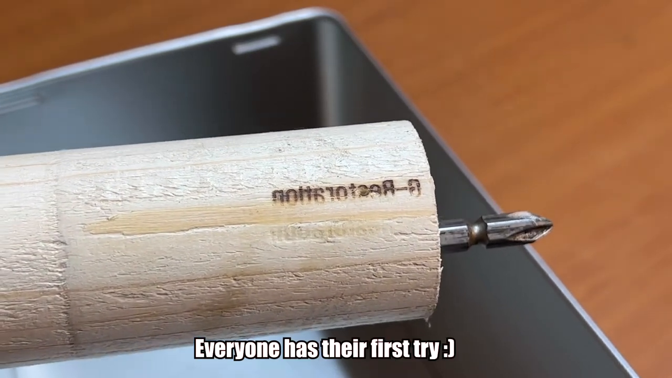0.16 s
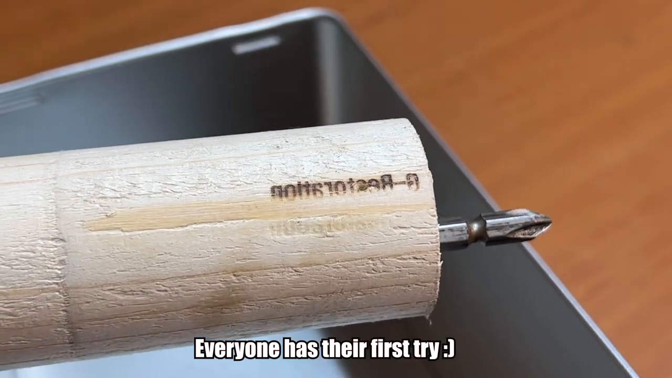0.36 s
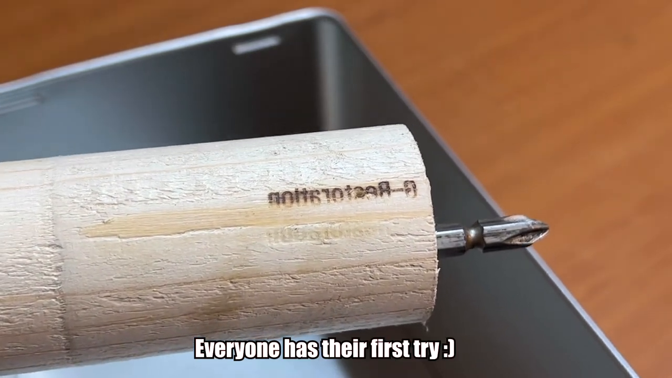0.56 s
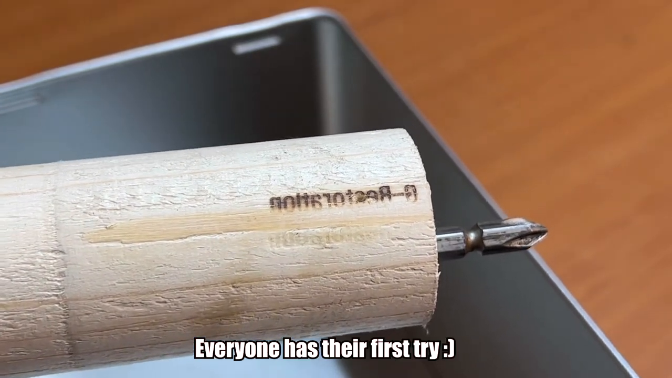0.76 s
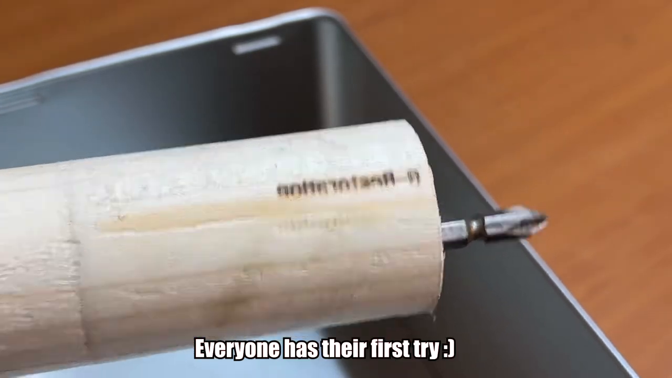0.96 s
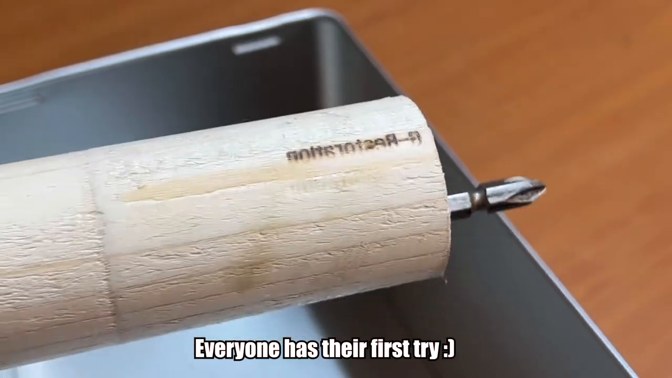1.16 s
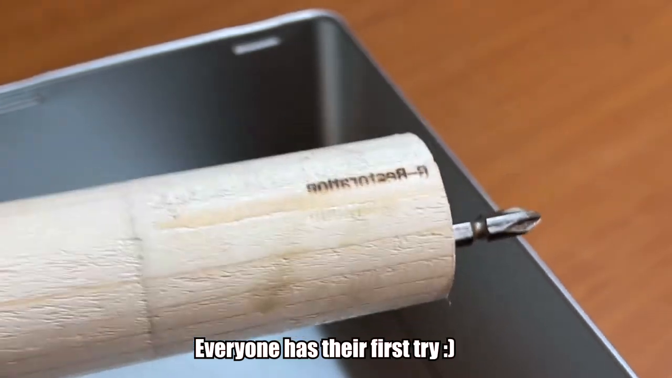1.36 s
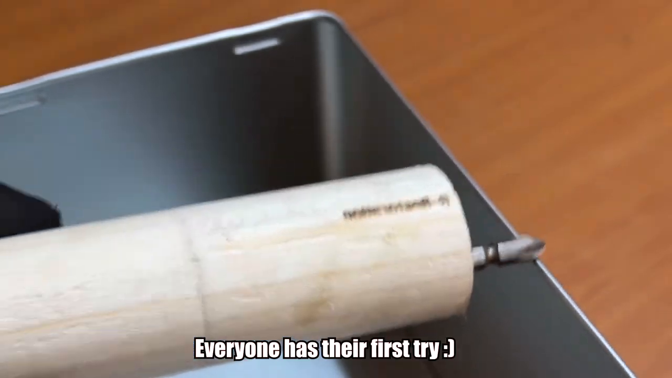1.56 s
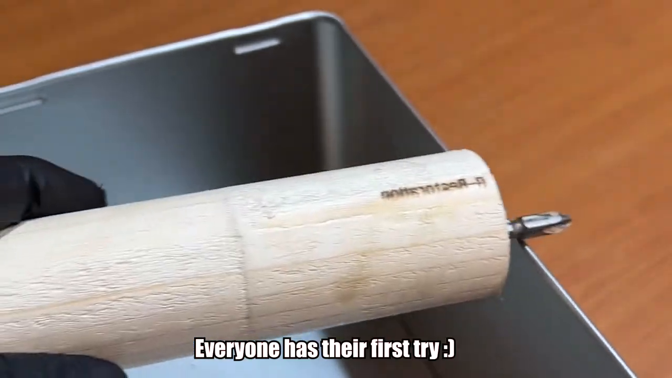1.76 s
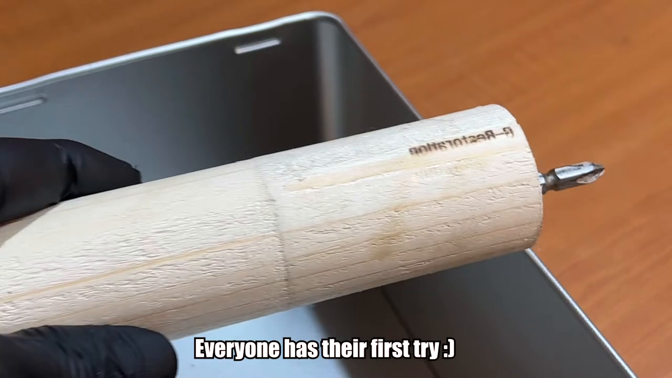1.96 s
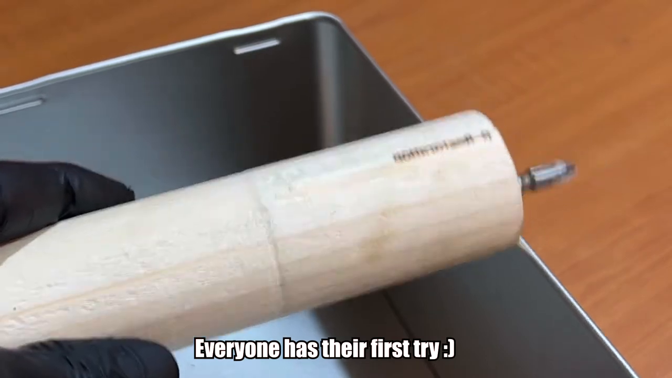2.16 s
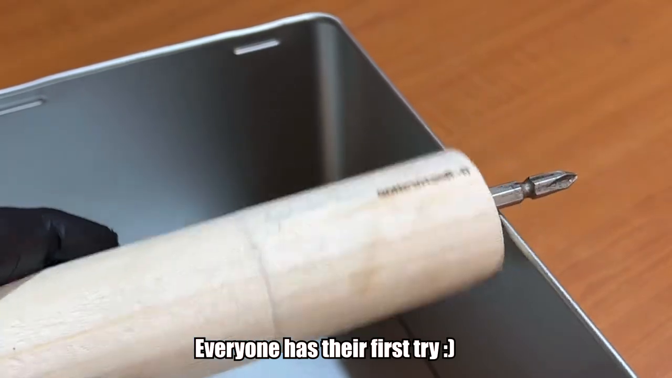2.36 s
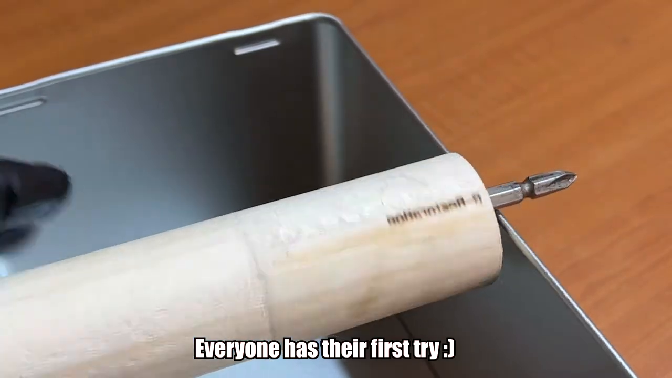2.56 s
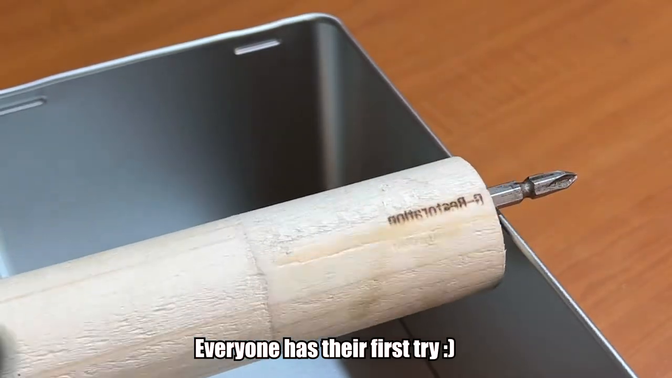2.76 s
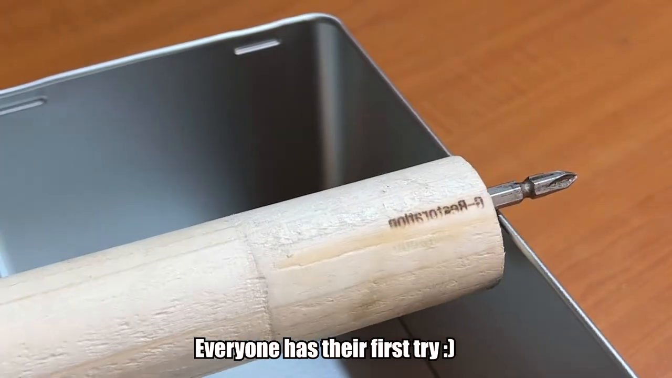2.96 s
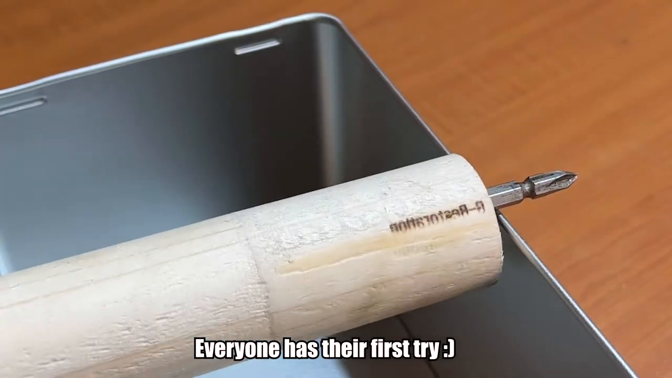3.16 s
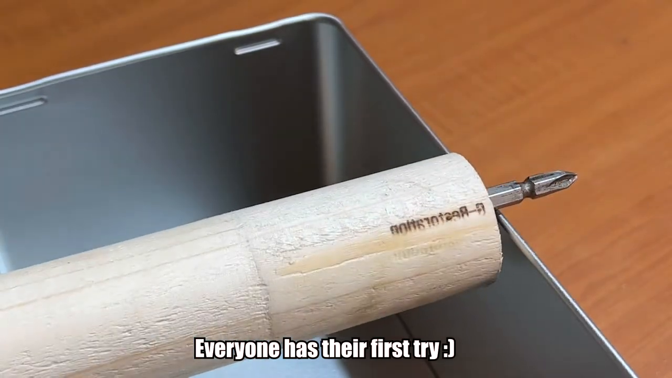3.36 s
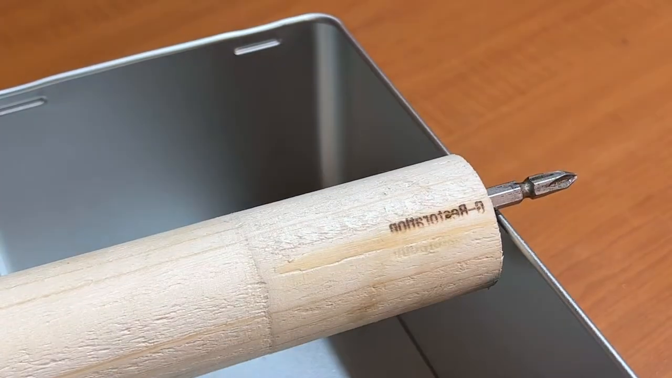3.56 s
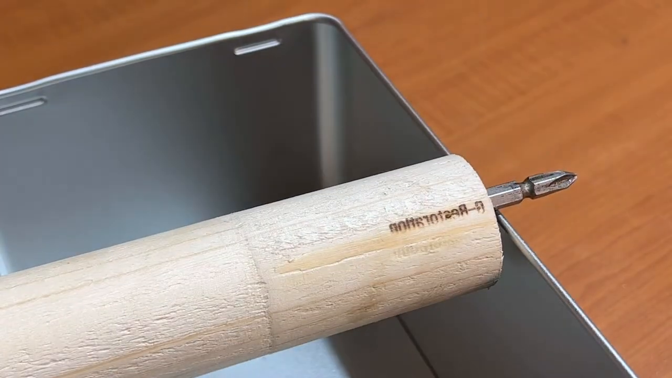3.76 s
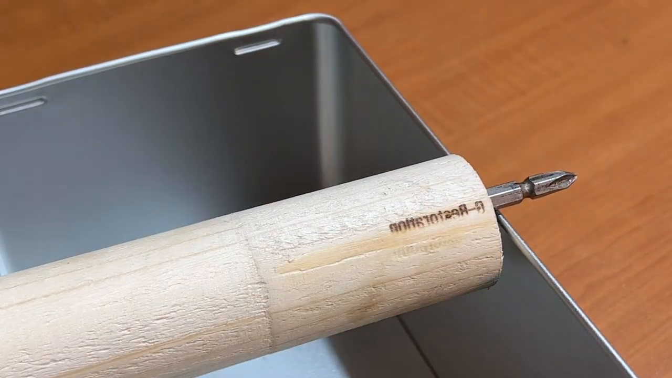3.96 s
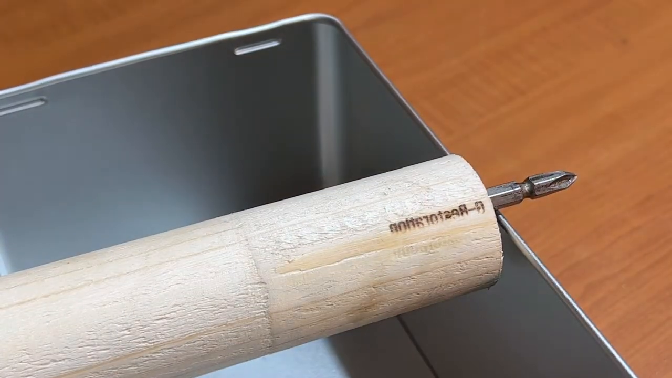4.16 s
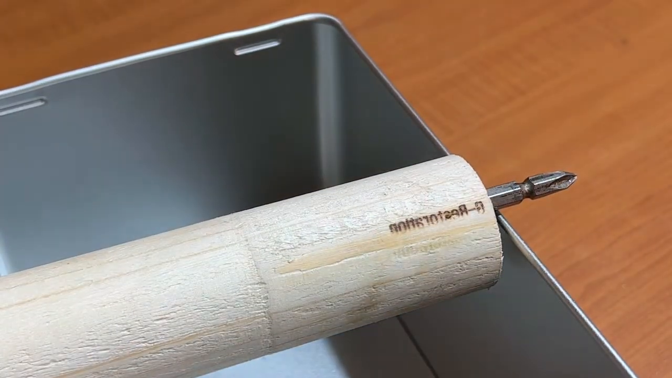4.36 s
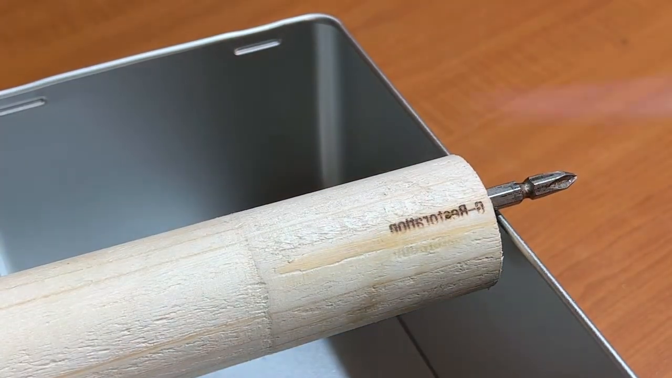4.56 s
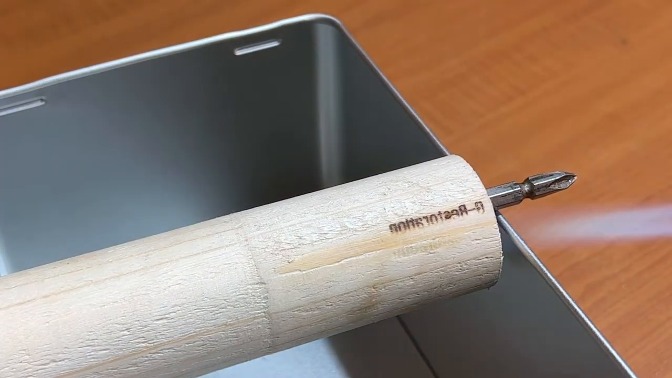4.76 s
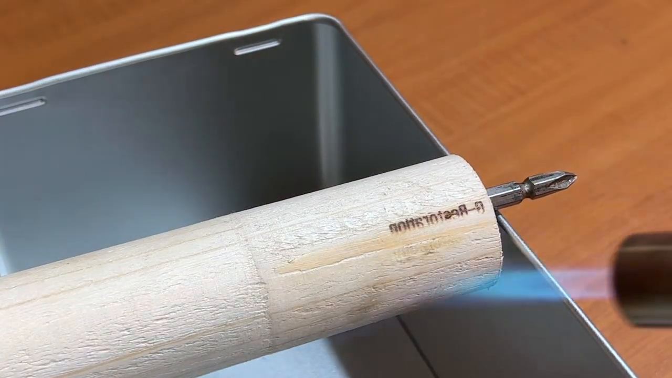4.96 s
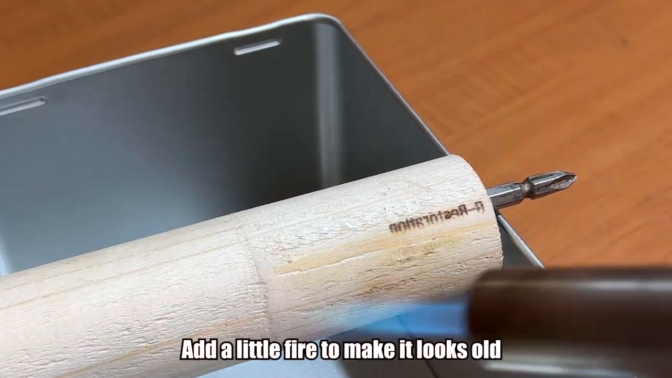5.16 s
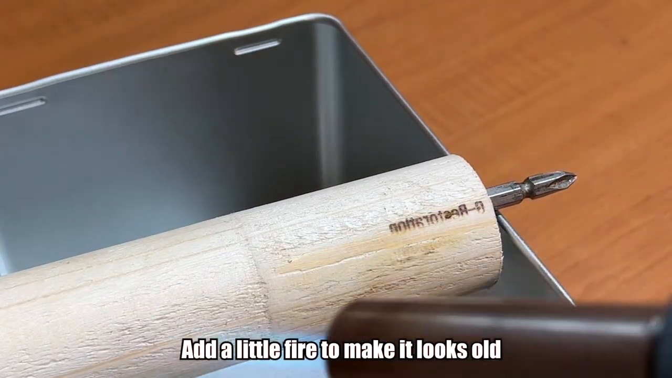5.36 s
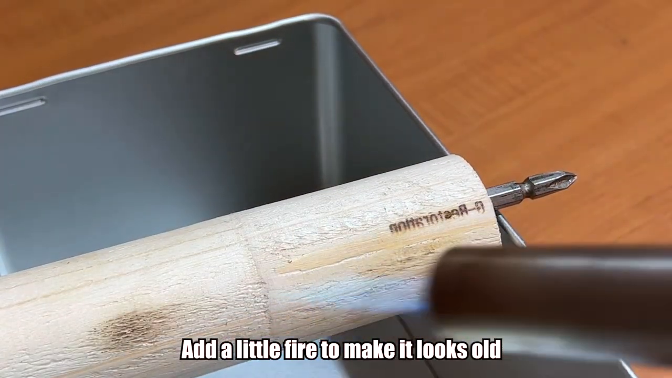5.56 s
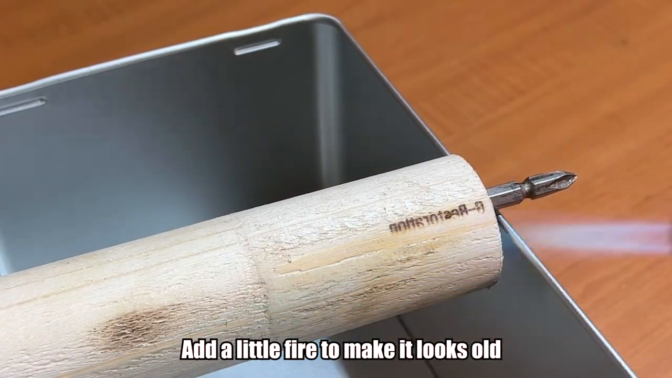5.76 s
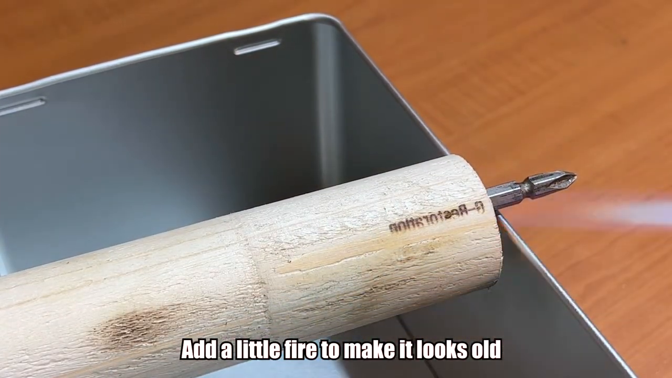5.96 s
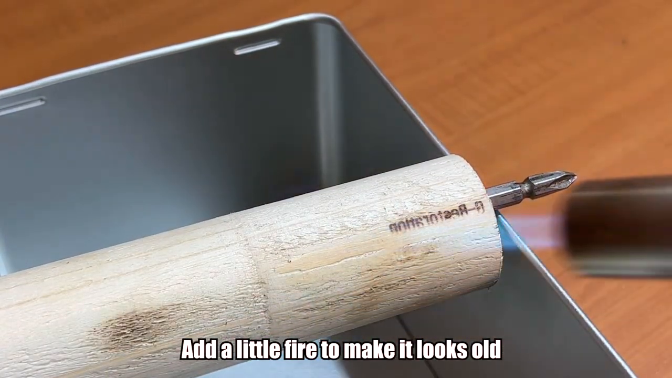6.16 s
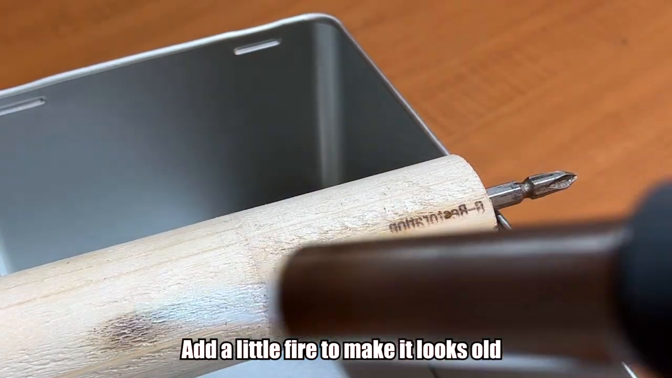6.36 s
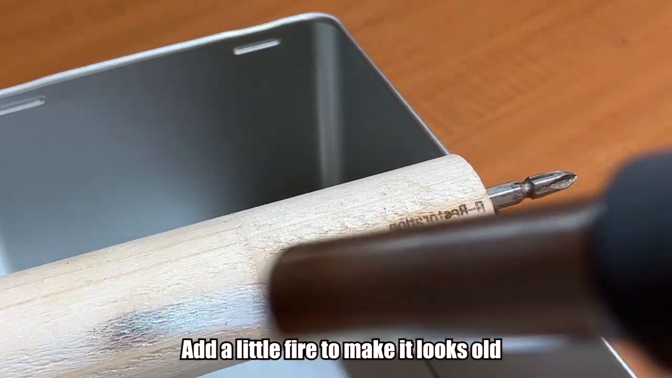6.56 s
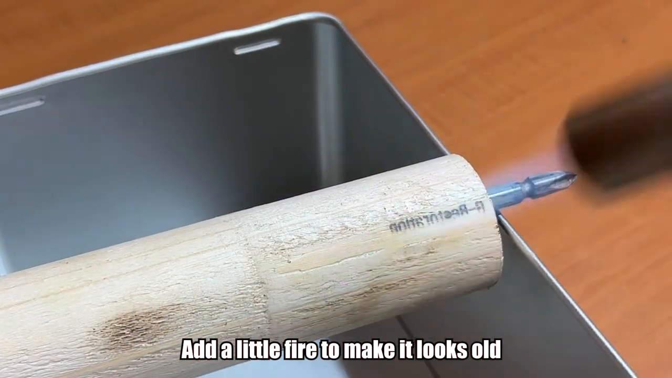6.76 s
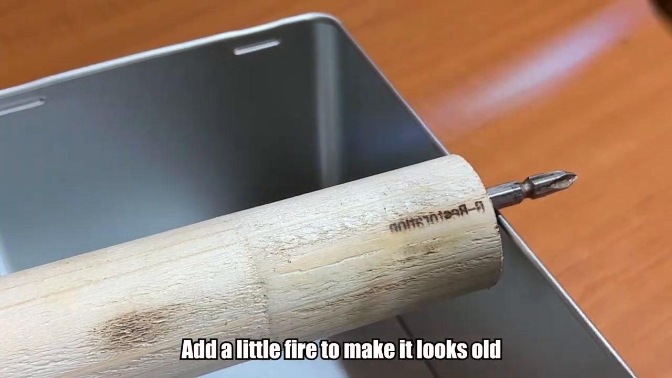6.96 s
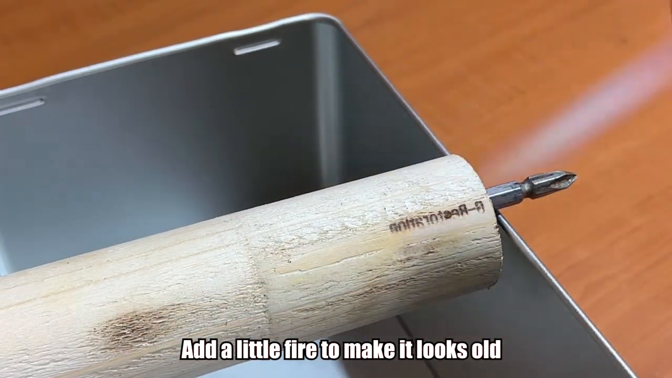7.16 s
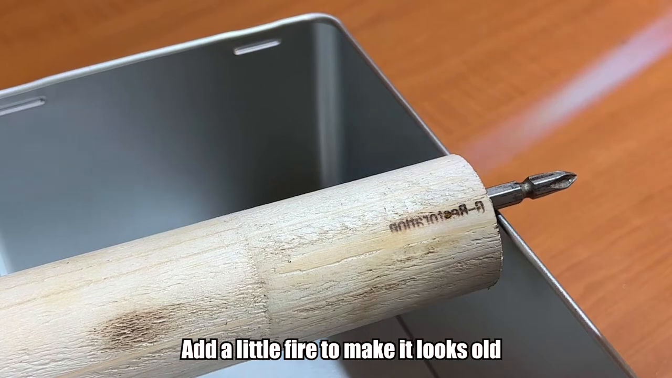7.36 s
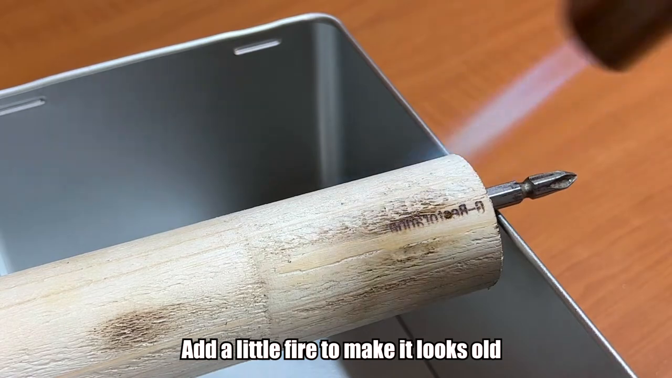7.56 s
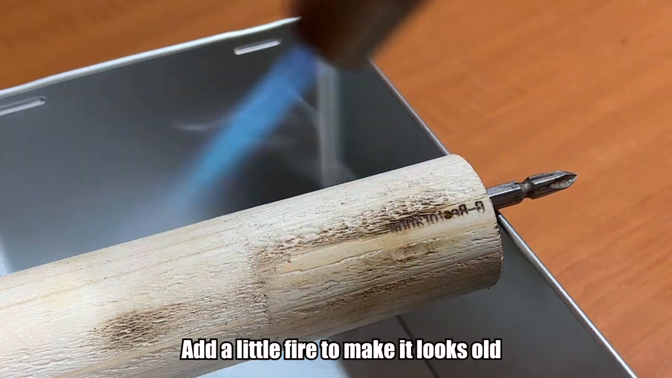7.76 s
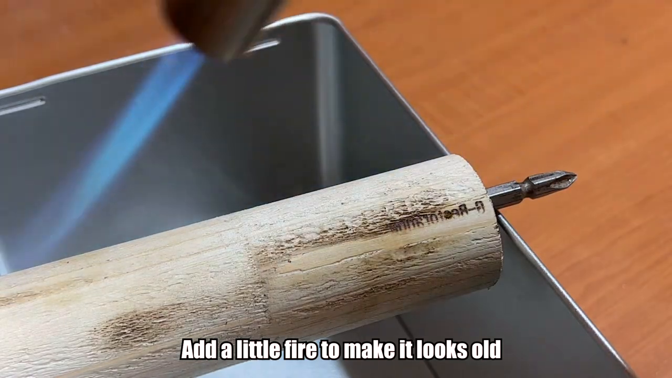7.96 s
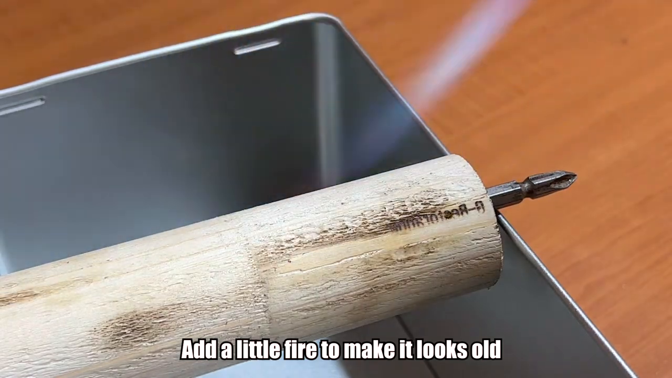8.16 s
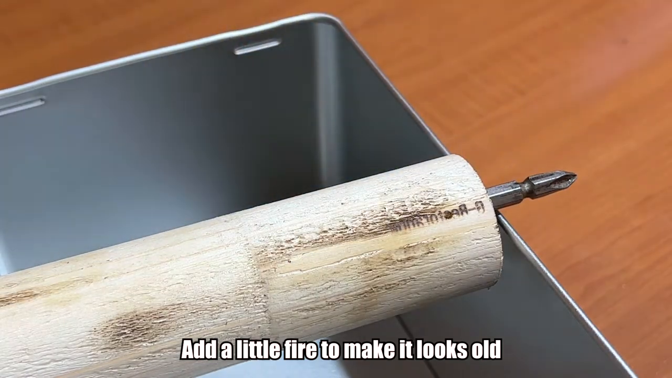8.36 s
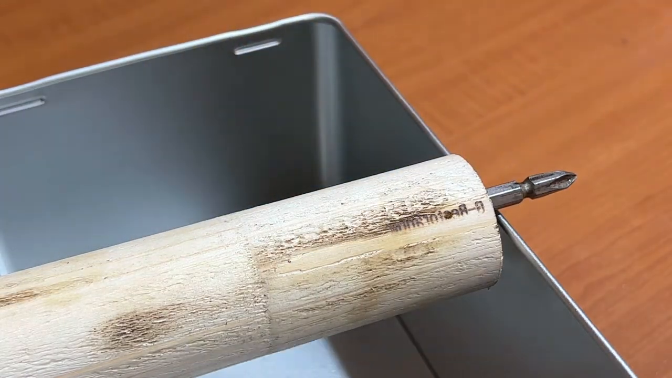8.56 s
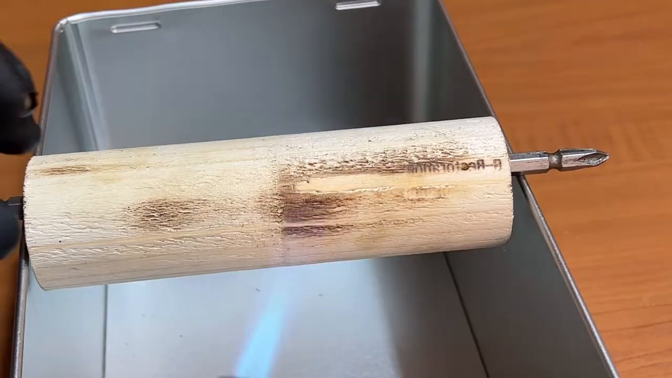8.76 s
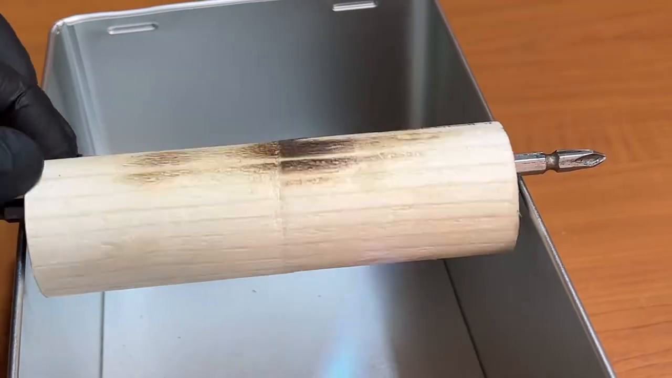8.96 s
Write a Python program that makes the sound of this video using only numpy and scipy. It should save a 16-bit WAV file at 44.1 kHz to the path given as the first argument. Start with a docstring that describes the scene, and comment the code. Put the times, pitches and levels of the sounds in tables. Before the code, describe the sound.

A quiet room with a low, slowly swelling hum and dull background noise, heard close in stereo. From about 1 second, faint rubber glove rubs on wood. At 1.6 a sharp double knock makes a thin steel tray clatter and ring briefly; short gritty metal scrapes come around 1.8 and 2.1, with weaker knocks at 2.0, 2.2, 2.4 and 2.6, then soft rubbing until about 3.4. At 3.5 gas begins hissing and the hum dips; small clicks lead to a hard snap and low thumping ignition near 3.8, off to the right. The flame tears and sputters until 4.5, moving to the centre, then settles into a deep fluttering roar under bright hiss. Hiss tones glide as the torch sweeps, strengthening near 5.5, 6.5 and 8.5; a small sputter comes at 7.0. The roar fades after 7.3 but flares at 8.2. At 8.7 it abruptly becomes hollow, higher flame noise.

```python
"""A hand torch hisses as filtered noise; its flame catches, sputters and settles to a steady turbulent roar
as the torch sweeps over wood. Before that a wooden handle is turned over: gloves rub, a steel bit drags,
and a steel tray rings in decaying modes. A low wavering hum (a sine) and dull room noise lie beneath.
Near the end the program cuts to a second scene: the flame blows into the tray, a hollower noise."""
import sys
import numpy as np
from scipy import signal
from scipy.fft import rfft, irfft, next_fast_len
from scipy.io import wavfile
from scipy.ndimage import map_coordinates

SR = 44100
rng = np.random.default_rng(int(sys.argv[2]) if len(sys.argv) > 2 else 0)


def waveform_to_disk(signal):
    """Save audio, clipped to [-1, 1], as 16-bit WAV at the path in sys.argv[1]."""
    frames = np.transpose(np.atleast_2d(signal))
    scaled = np.clip(frames, -1, 1) * 32767
    samples = np.round(scaled).astype(np.int16)
    wavfile.write(sys.argv[1], SR, samples)


N = 397631
TIME = np.arange(N) / SR
GAS_ON_S, LIT_S, INTO_TRAY_S = 3.531, 3.782, 8.664


def amp(db):
    """Decibels to gain."""
    return 10 ** (np.asarray(db) / 20)


def unit(x):
    """x at rms 1."""
    return x / np.sqrt(np.mean(x ** 2) + 1e-20)


def along(points, hz):
    """(Hz, value) points read on a log axis."""
    f, v = np.transpose(points)
    return np.interp(np.log(hz + 1), np.log(f + 1), v)


def curves(rows, t=TIME):
    """Each column after the first, read at the times t."""
    s, *cols = np.transpose(rows)
    return [np.interp(t, s, c) for c in cols]


def bumps(peaks, at):
    """Gain in dB of smooth (centre, half width, dB) peaks, over frequency or over time."""
    return sum(db * np.exp(-((at - centre) / width) ** 2) for centre, width, db in peaks)


def wobble(rate_hz):
    """A smooth random curve of rms 1, rate_hz knots a second."""
    knots = rng.standard_normal(int(N * rate_hz / SR) + 4)
    return unit(map_coordinates(knots, [TIME * rate_hz]))


def ramp(start_s, rise_s):
    """0 before start_s, 1 from rise_s later."""
    return np.clip((TIME - start_s) / rise_s, 0, 1)


def burst(start_s, length_s, rise, t60):
    """Rises, holds until length_s after its start, dies away; rise and t60 in seconds."""
    return ramp(start_s, rise) * amp(-60 * np.maximum(TIME - start_s - length_s, 0) / t60)


def filtered(x, response):
    """x times a response of frequency."""
    n = x.shape[-1]
    m = next_fast_len(n + 8192)
    return irfft(rfft(x, m) * response(np.fft.rfftfreq(m, 1 / SR)), m)[..., :n]


def stereo(mid, side):
    """Left and right from their sum and difference."""
    return np.array([mid + side, mid - side])


def noise(spectrum, side_db, size=N):
    """Coloured stereo noise of rms 1; side_db sets its width."""
    mid, side = filtered(rng.standard_normal((2, size)), lambda hz: amp(along(spectrum, hz)))
    return unit(stereo(mid, amp(side_db) * side))


def shaped(x, gain_db):
    """x under a gain that changes with frequency and time."""
    hz, t, z = signal.stft(x, SR, nperseg=512)
    return signal.istft(z * amp(gain_db(hz[:, None], t)), SR)[1][..., :x.shape[-1]]


def add(track, s, sound):
    """Mixes a short sound in at s seconds."""
    part = track[:, round(s * SR):][:, :sound.shape[-1]]
    part += sound[..., :part.shape[-1]]


# The hum's slow swells. Each row: time in seconds, level in dB before trim.
HUM_SWELLS = [(0.15, -55), (0.6, -47.5), (0.95, -47), (1.17, -55.4), (1.45, -38.5), (1.68, -34.5),
              (2.0, -40.5), (2.14, -51), (2.32, -39.5), (2.75, -43), (3.0, -50.5), (3.2, -42.5), (3.5, -38),
              (4.25, -46.5), (5.6, -56.6), (6.45, -47), (7.7, -46.5), (8.15, -42), (8.45, -45), (8.66, -52)]
HUM_HZ, HUM_DRIFT_HZ, HUM_WAVER_DB = 62.74, 1.3, 0.5  # centre pitch, rms wander of pitch and level
HUM_TRIM_DB, HUM_DROP_DB = -1, -0.5  # overall, and the step when the hiss sets in
LULL_DB, LULL_S = -18, 0.13  # the hum dips briefly as the hiss sets in


def hum():
    """One low sine that swells and wanders in pitch; it drops when the hiss sets in."""
    swell_db, = curves(HUM_SWELLS)
    drop_db = HUM_DROP_DB * ramp(GAS_ON_S, 0.0025)
    lull_db = LULL_DB * burst(GAS_ON_S, LULL_S, rise=0.0012, t60=0.76)
    level_db = swell_db + HUM_TRIM_DB + HUM_WAVER_DB * wobble(8) + drop_db + lull_db
    phase = 2 * np.pi * np.cumsum(HUM_HZ + HUM_DRIFT_HZ * wobble(9)) / SR
    return np.sqrt(2) * amp(level_db) * np.sin(phase)


# Room noise spectrum. Each row: frequency in Hz, relative level in dB per Hz.
ROOM_SPECTRUM = [(15, -69), (25, -44), (42, -18.5), (60, -9.5), (85, -6), (113, -20), (220, -27),
                 (327, -37), (927, -38.5), (1080, -44), (2060, -54), (4200, -76.5), (8000, -75),
                 (15000, -91.5)]
# Room noise width. Each row: frequency in Hz, side over mid in dB.
ROOM_SIDE = [(60, -20), (150, -14.5), (500, 0.5), (1000, -0.5), (3000, -19)]


def room():
    """Dull stereo noise, wider in some bands; it drops when the hiss sets in."""
    def mid_side(hz):
        mid_db = along(ROOM_SPECTRUM, hz)
        return amp([mid_db, mid_db + along(ROOM_SIDE, hz)])
    mid, side = filtered(rng.standard_normal((2, N)), mid_side)
    level_db = -50.5 - 3.1 * ramp(GAS_ON_S, 0.0025)
    return amp(level_db) * unit(stereo(mid, side))


# Gloves slide on the wood. Each row: start in seconds, length in seconds, level in dB.
GLOVE_STROKES = [(1.027, 0.029, -83), (1.099, 0.028, -85), (1.289, .05, -79), (1.676, 0.1, -75),
                 (2.268, 0.25, -71), (2.796, 0.13, -76.5), (3.001, 0.35, -76)]
# Rubbing spectrum. Each row: frequency in Hz, relative level in dB per Hz.
RUB_SPECTRUM = [(300, -8), (1500, 10.5), (3500, -2.5), (5500, -5.5), (8000, -5.5), (12000, -6.5),
                (16000, -19)]
STROKE_RISE_S, STROKE_T60_S = .045, .7


def gloves():
    """Rubber slides over the wood in small catches: noise with a quick random level."""
    strokes = sum(amp(db) * burst(s, length_s, rise=STROKE_RISE_S, t60=STROKE_T60_S)
                  for s, length_s, db in GLOVE_STROKES)
    return strokes * amp(1.1 * wobble(43)) * noise(RUB_SPECTRUM, side_db=-13.5)


# The handle meets the tray. Each row: time in seconds, low level in dB, middle level in dB,
# high level in dB, thud in Hz, share of the free ring time 0-1.
TRAY_KNOCKS = [(1.586, -27, -32, -32.5, 474, 0.97), (1.597, -32, -32, -34, 410, 0.99),
               (2.033, -41, -57, -75.5, 414.7, 1), (2.227, -34.5, -29, -34.5, 460, 0.6),
               (2.41, -38.5, -70, -62.5, 496, 0.7), (2.606, -50.5, -72.5, -72, 524, 0.9)]
# The tray's clear modes. Each row: frequency in Hz, relative level in dB.
TRAY_MODES = [(153, -8.5), (180, -2.5), (245, 2), (307, 0), (388, -1.5), (420, -2.5), (468, -3.5),
              (522, -8), (554, 0), (616, -9), (684, 0), (850, -8.5), (904, 0.5), (1044, -14.5), (1197, 0),
              (1268, -2.5), (1420, -4), (1457, -6), (1576, -12.5), (1685, -16), (1793, -8), (1837, -10),
              (2072, -16.5), (2323, -7.5), (2355, -19.5), (2775, -10.5), (2912, -17.5), (2965, -19.5),
              (3868, -20.5), (4479, -29.5), (5405, -29), (6266, -28.5), (6848, -27.5), (7994, -22.5)]
# The tray's dense modes. Each row: frequency in Hz, relative level in dB per Hz.
TRAY_WASH_SPECTRUM = [(100, -8.5), (160, -1), (600, -3), (1700, -2.5), (2300, -8.5), (2900, -5),
                      (4200, -13.5), (8500, -10.5), (11500, -16), (16000, -23.5)]
# The tray's typical free decay. Each row: frequency in Hz, t60 in seconds.
TRAY_T60 = [(150, 0.82), (600, 0.89), (1500, 0.7), (4000, 0.61), (12000, 0.33)]
KNOCK_BANDS_HZ = [(150, 700), (700, 3000), (3000, 15000)]


def early_rms(hit, lo_hz, hi_hz):
    """The rms of a band over the first 40 ms."""
    band = filtered(hit, lambda hz: (hz > lo_hz) & (hz < hi_hz))
    return np.std(band[:, :SR // 25])


def knocks():
    """Each blow rings the tray's clear modes and a wash of dense ones; each spot has its own thud."""
    track, t = np.zeros((2, N)), np.arange(SR) / SR
    mode_hz, mode_db = np.transpose(TRAY_MODES)[:, :, None]
    count = len(TRAY_MODES)
    t60 = along(TRAY_T60, mode_hz) * np.exp(rng.standard_normal(mode_hz.shape) / 7)
    for s, low_db, middle_db, high_db, thud_hz, free in TRAY_KNOCKS:
        strength = amp(mode_db + 2 * rng.standard_normal(mode_hz.shape) - 60 * t / (free * t60))
        # the handle keeps touching the sheet: phases wander
        drift = np.cumsum(rng.standard_normal((count, SR)), axis=1) / np.sqrt(2 * SR)
        start_phase = 2 * np.pi * rng.random(mode_hz.shape)
        channel_phase = rng.standard_normal((2, count, 1)) / 2
        phase = start_phase + channel_phase + 2 * np.pi * drift
        ring = np.sum(strength * np.sin(2 * np.pi * mode_hz * t + phase), axis=1)
        wash = shaped(noise(TRAY_WASH_SPECTRUM, side_db=-18, size=SR),
                      lambda hz, age_s: -60 * age_s / along(TRAY_T60, hz))
        clatter = noise(TRAY_WASH_SPECTRUM, side_db=-14.5, size=SR) * amp(-60 * t / .14)
        mix = amp(-9) * ring + amp(-8.0) * wash + amp(7.0) * clatter
        spot = [(thud_hz, 55, 5), (1700, 250, 2)]  # Hz, half width Hz, dB
        hit = filtered(mix, lambda hz: amp(bumps(spot, hz)))
        # gains that bring each band's onset near its level in the table
        early = [early_rms(hit, lo_hz, hi_hz) for lo_hz, hi_hz in KNOCK_BANDS_HZ]
        low, middle, high = np.array([low_db, middle_db, high_db]) - 20 * np.log10(early)
        tone = [(150, low), (250, low - 4), (600, low - 2), (1100, middle - 1),
                (2200, (2 * middle + high) / 3 - 1), (3800, high - 1.5)]
        attack = 1 - np.exp(-t / 0.00019)
        add(track, s, filtered(hit, lambda hz: amp(along(tone, hz))) * attack)
    return track


# The bit drags on the tray's rim. Each row: start in seconds, length in seconds, level in dB.
DRAGS = [(1.824, 0.057, -59.5), (2.1, .004, -61), (2.121, 0.053, -59.5)]
# Scraping spectrum. Each row: frequency in Hz, relative level in dB per Hz.
DRAG_SPECTRUM = [(200, -11.5), (500, 5), (1500, 3), (3500, -7.5), (5500, -13), (8000, -8), (12000, -15),
                 (16000, -24.5)]
# The steel bit's resonances. Each row: centre in Hz, half width in Hz, gain in dB.
BIT_RESONANCES = [(2620, 110, 7), (3460, 120, 1), (4530, 140, 8)]


def bit_drag():
    """The steel bit scrapes on the rim: rough noise through the bit's resonances."""
    drag = sum(amp(db) * burst(s, length_s, rise=0.0074, t60=0.079) for s, length_s, db in DRAGS)
    scrape = filtered(noise(DRAG_SPECTRUM, side_db=-18.5), lambda hz: amp(bumps(BIT_RESONANCES, hz)))
    return drag * unit(amp(2.1 * wobble(300)) * scrape)


# The hiss grows as the torch comes near and fades as it leaves. Each row: time in seconds,
# level in dB before close passes and the unlit cut.
JET_LEVEL = [(4.55, -52.5), (4.9, -50.5), (5.7, -51), (6.1, -51.5), (6.8, -50.5), (7.1, -51.3), (8.1, -52),
             (8.64, -58)]
# Hiss before the burner tube. Each row: frequency in Hz, relative level in dB per Hz.
JET_SPECTRUM = [(300, -9.5), (1500, -6.5), (3000, -4), (5500, -0.5), (7000, 4), (9500, 2.5), (12000, 3.5),
                (13300, -10.5), (15200, -3), (16000, -7)]
# Burner tube resonances. Each row: centre in Hz, half width in Hz, gain in dB.
TUBE_RESONANCES = [(3714, 184, 11), (4538, 910, 16.5), (7970, 500, 8), (8737, 640, 14), (12350, 330, 0.5)]
# The torch swings over the wood. Each row: time in seconds, extra path of the hiss's reflection in m.
SWING_PATH = [(4.3, .465), (4.65, .43), (4.95, .414), (5.2, .428), (5.47, .451), (5.85, .402), (6.05, .401),
              (6.52, .438), (6.85, .401), (7.45, .394), (7.92, .447), (8.28, .403), (8.62, .43)]
# That reflection is strongest where the nozzle beams. Each row: frequency in Hz, strength 0-1.
ECHO_STRENGTH = [(3700, .15), (4600, .55), (6000, .33), (8500, .42), (15000, .25)]
# The nozzle passes right by the microphones. Each row: time in seconds, half length in seconds,
# gain of the top resonance in dB.
NEAR_PASSES = [(5.45, .17, 3), (6.5, 0.12, 6), (8.55, 0.29, 5)]
PASS_LOUDER = 0.27  # share of that gain that the whole hiss takes
AIM_DB, AIM_DB_PER_M = -3, 31  # the top resonance beams forward: gain at mean path, change with path
UNLIT_DB = -4.5  # the hiss before the flame catches
SOUND_M_PER_S = 343


def jet():
    """Gas hisses through the burner tube and bounces off the wood: peaks glide as the torch is swung."""
    def colour_db(hz, t):
        path_m, = curves(SWING_PATH, t)
        mean_path_m = np.mean(SWING_PATH, axis=0)[1]
        aim_db = AIM_DB + AIM_DB_PER_M * (path_m - mean_path_m) + bumps(NEAR_PASSES, t)
        beam_db = aim_db * np.exp(-((hz - 8500) / 900) ** 2)
        echo = along(ECHO_STRENGTH, hz) * np.exp(-2j * np.pi * hz * path_m / SOUND_M_PER_S)
        # 1 / |1 - echo|: a comb of narrow peaks
        return bumps(TUBE_RESONANCES, hz) + beam_db - 20 * np.log10(np.abs(1 - echo))
    unlit_db = UNLIT_DB * (1 - ramp(LIT_S, 0.037))
    level_db = curves(JET_LEVEL)[0] + PASS_LOUDER * bumps(NEAR_PASSES, TIME) + unlit_db
    hiss = unit(shaped(noise(JET_SPECTRUM, side_db=-33), colour_db))
    return amp(level_db) * hiss * ramp(GAS_ON_S, 0.0034)


# The valve and the igniter. Each row: start in seconds, level in dB, length in seconds.
SNAPS = [(3.545, -49, 0.0022), (3.699, -46, 0.0056), (3.770, -26, 0.0054), (3.962, -31.5, 0.0068)]
# Click spectrum. Each row: frequency in Hz, relative level in dB per Hz.
SNAP_SPECTRUM = [(200, 3), (1500, -5), (3000, 3.5), (4600, -9), (6300, 1.5), (9000, -0.5), (12000, -3),
                 (16000, -11)]


def clicks():
    """Valve and igniter snap as short noise bursts, each with a weaker ring in the room."""
    snap = 0
    for s, db, length_s in SNAPS:
        direct = burst(s, length_s, rise=.0005, t60=0.005)
        ring = amp(-11.0) * burst(s, length_s, rise=0.013, t60=0.53)
        snap = snap + amp(db) * (direct + ring)
    return snap * noise(SNAP_SPECTRUM, side_db=-13.5)


# The flame tears and sputters. Each row: start in seconds, length in seconds, bang level in dB,
# crackle level in dB.
SPUTTER_RUNS = [(3.779, 0.032, -35.5, -55), (3.832, 0.19, -43.5, -57.5), (3.97, 0.043, -34.5, -40),
                (4.066, .014, -36.5, -35), (4.089, .02, -31.5, -38), (4.114, 0.037, -38, -35),
                (4.173, .007, -40.5, -44.5), (4.343, 0.061, -39, -36.5), (4.411, 0.066, -36, -36),
                (4.489, 0.044, -48.5, -44), (7.012, 0.031, -38.5, -38)]
# Bang spectrum. Each row: frequency in Hz, relative level in dB per Hz.
BANG_SPECTRUM = [(25, -30), (45, -15), (100, 5), (200, 3), (480, -0.5), (750, -6), (1300, -35),
                 (2500, -42.5)]
# Tearing spectrum, shared with flicks(). Each row: frequency in Hz, relative level in dB per Hz.
TEARING_SPECTRUM = [(300, -18), (750, 6.5), (1200, 0), (2200, -4), (3500, -9), (6000, -14.5), (8500, -12),
                    (12000, -20.5), (16000, -22.5)]


def sputters():
    """The flame lifts off the burner and tears in runs of tiny bangs, each with a bright crackle."""
    bangs = sum(amp(db) * burst(s, length_s, rise=.004, t60=0.14) for s, length_s, db, _ in SPUTTER_RUNS)
    crackle = sum(amp(db) * burst(s, length_s, rise=.002, t60=.09) for s, length_s, _, db in SPUTTER_RUNS)
    pops = amp(5 * np.tanh(wobble(130) / 2 + wobble(450) / 2))
    low, high = noise(BANG_SPECTRUM, side_db=-11), noise(TEARING_SPECTRUM, side_db=-16)
    return bangs * unit(pops * low) + crackle * unit(pops * high)


# Pockets of gas catch. Each row: start in seconds, level in dB, pitch in Hz, t60 in seconds.
GAS_PUFFS = [(3.782, -24, 85, 0.11), (3.808, -16, 168, 0.016), (4.123, -26.5, 94, 0.15)]


def puffs():
    """The gathered gas goes up in low puffs: decaying sines."""
    return sum(amp(db) * burst(s, 0, rise=0.0012, t60=t60_s) * np.sin(2 * np.pi * hz * (TIME - s))
               for s, db, hz, t60_s in GAS_PUFFS)


# The flame spreads on the wood and flares. Each row: time in seconds, half length in seconds, gain in dB.
FLAME_FLARES = [(5.1, 0.45, 1.5), (5.7, 0.13, 2.5), (6.35, 0.16, 2), (6.85, 0.17, 1.1), (7.27, 0.15, 1),
                (8.22, .13, 4.5)]
# Roar spectrum. Each row: frequency in Hz, relative level in dB per Hz.
ROAR_SPECTRUM = [(25, -20), (45, -25), (90, -2.5), (160, -4.5), (280, 1), (390, -4), (450, -11.5),
                 (560, -22.5), (900, -43)]
# Flutter spectrum. Each row: frequency in Hz, relative level in dB per Hz.
FLUTTER_SPECTRUM = [(200, -8), (560, -6), (700, -0.5), (880, 2), (1250, -4), (1700, -13.5), (2400, -13.5),
                    (3200, -26), (7000, -43.5)]
ROAR_DB, FLUTTER_DB = -39.5, -53.5  # the settled flame
GROW_DB, GROW_S = 18.5, 0.18  # starts this much weaker, builds with this time constant
LEAVE_AT_S, LEAVE_DB_PER_S = 7.3, 2.5  # the torch is drawn back and the flame fades
FLUTTER_SWING = 1.2  # flutter dB per dB of flame strength
ROUGH_DB, SETTLED_S = 5, 4.68  # extra flutter until the flame has settled


def flame():
    """Turbulent burning builds, flares on the wood and fades: a deep roar under a quick flutter."""
    growth_db = -GROW_DB * np.exp(-np.maximum(TIME - LIT_S, 0) / GROW_S)
    leaving_db = -LEAVE_DB_PER_S * np.maximum(TIME - LEAVE_AT_S, 0)
    strength_db = bumps(FLAME_FLARES, TIME) + growth_db + leaving_db
    rough_db = ROUGH_DB * (1 - ramp(SETTLED_S, .2))
    eddies = wobble(45)
    roar = unit(amp(1.0 * eddies) * noise(ROAR_SPECTRUM, side_db=-19.0))
    flutter = unit(amp(1.4 * eddies + 1.16 * wobble(220)) * noise(FLUTTER_SPECTRUM, side_db=-20.0))
    flutter_db = FLUTTER_DB + FLUTTER_SWING * strength_db + rough_db
    return (amp(ROAR_DB + strength_db) * roar + amp(flutter_db) * flutter) * ramp(LIT_S, 0.022)


ASIDE_DB, ASIDE_SIDE_DB = 3.5, 14  # right over left, extra room sound
ASIDE_UNTIL_S, BRING_IN_S = 3.76, 0.81


def widened(x, side_db):
    """A stereo pair with the difference of its channels raised by side_db."""
    return stereo((x[0] + x[1]) / 2, amp(side_db) * (x[0] - x[1]) / 2)


def from_the_side(x):
    """Lit off to the right, where more arrives by way of the room, then brought to the middle."""
    aside = 1 - ramp(ASIDE_UNTIL_S, BRING_IN_S)
    return widened(x, ASIDE_SIDE_DB * aside) * amp(np.outer([-.5, .5], ASIDE_DB * aside))


def flicks(count=110):
    """The flame tears for an instant now and then: faint noise ticks, a few of them stronger."""
    track, t = np.zeros((1, N)), np.arange(SR // 40) / SR
    for when, size in rng.random((count, 2)):
        tick = amp(-56 + 11.5 * size ** 3 - 60 * t / .03)
        add(track, LIT_S + when * (INTO_TRAY_S - LIT_S), tick)
    return track * noise(TEARING_SPECTRUM, side_db=-27.5)


# Flame in the tray. Each row: frequency in Hz, relative level in dB per Hz.
HOLLOW_SPECTRUM = [(24, -83), (40, -43), (117, -17), (143, -12), (166, -3), (208, -9.5), (318, -2),
                   (389, -9.5), (744, -1), (1170, -6.5), (1830, -26), (2660, -24.5), (8840, -42.5),
                   (11300, -32.5), (15700, -27.5)]
# Resonances between the tray's walls. Each row: centre in Hz, half width in Hz, gain in dB.
WALL_RESONANCES = [(2355, 300, 6), (7900, 600, 2.5), (11100, 400, 12.5), (12100, 350, 4), (13940, 600, 8),
                   (14700, 400, -10)]
HOLLOW_DB = -40.5


def flame_in_tray():
    """The flame blows between the tray's walls: a hollow, higher roar."""
    roar = filtered(noise(HOLLOW_SPECTRUM, side_db=-20.0), lambda hz: amp(bumps(WALL_RESONANCES, hz)))
    return amp(HOLLOW_DB + 0.69 * wobble(32)) * unit(roar) * amp([[.2], [-.2]])


# Phase between the two microphones. Each row: frequency in Hz, phase in radians.
MIC_PHASE = [(0, 0), (3000, 0), (4000, .7), (5900, -.3), (7400, 0), (8530, -1.2), (9560, -3), (10500, -3.2),
             (12700, -6.1), (14400, -6.6), (15800, -8.9)]


def scene():
    """Near sounds reach the two microphones out of step in the treble; then the tray scene takes over."""
    handling = gloves() + knocks() * amp([[.5], [-.5]]) + bit_drag()
    burning = from_the_side(flame() + sputters()) + flicks()
    near = hum() + room() + handling + jet() + clicks() + puffs() + burning

    def out_of_step(hz):
        phase = np.interp(hz, *np.transpose(MIC_PHASE))
        return np.exp(.5j * np.outer([1, -1], phase))
    pair = filtered(near, out_of_step) * amp([[.15], [-.15]])
    turned = ramp(INTO_TRAY_S - .004, 0.022)
    return pair * (1 - turned) + flame_in_tray() * turned


TOP_HZ = 15800


def record(dry):
    """A steep low-pass: nothing is kept from the band limit up."""
    return filtered(dry, lambda hz: hz < TOP_HZ)


dry = scene()
out = record(dry)
waveform_to_disk(out)
```